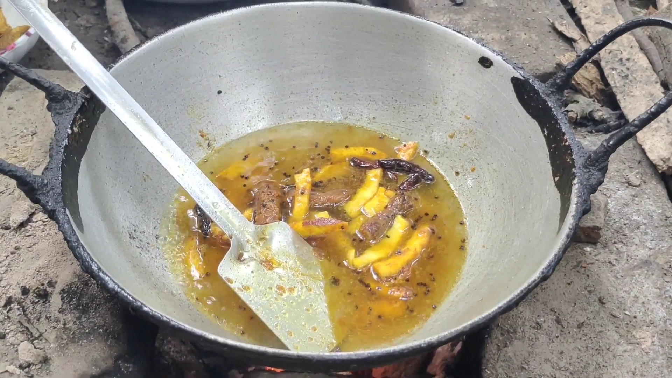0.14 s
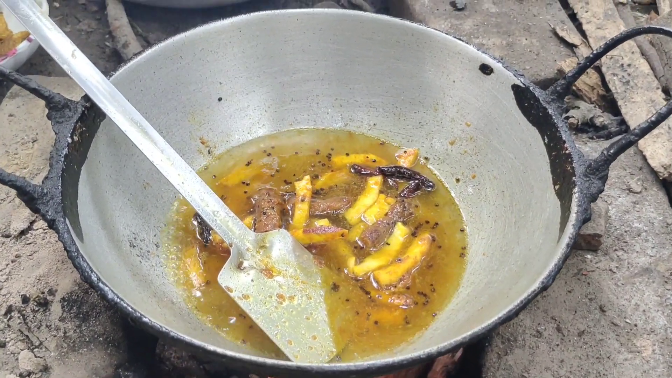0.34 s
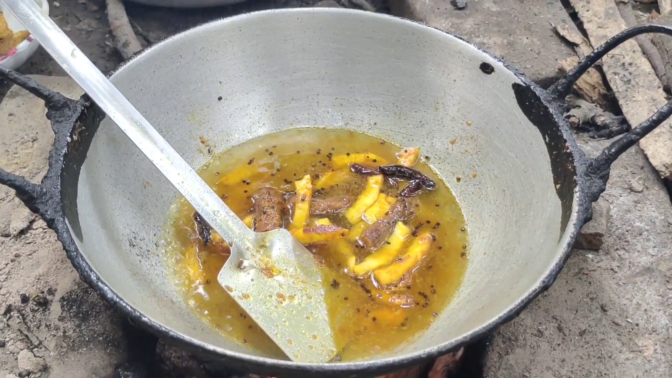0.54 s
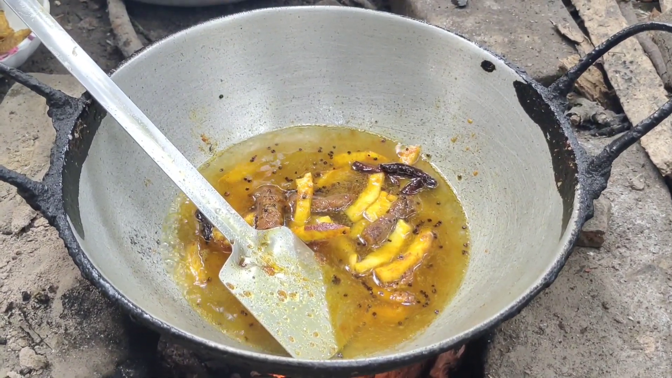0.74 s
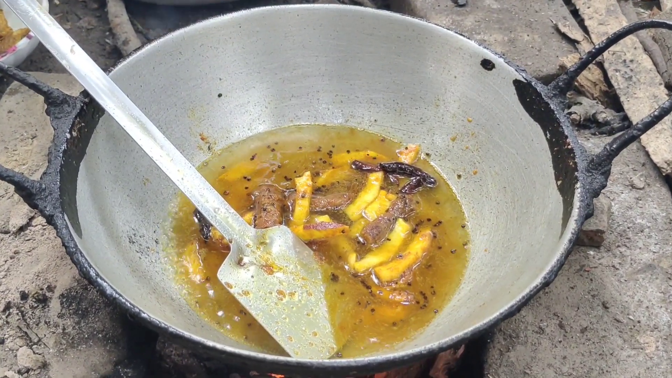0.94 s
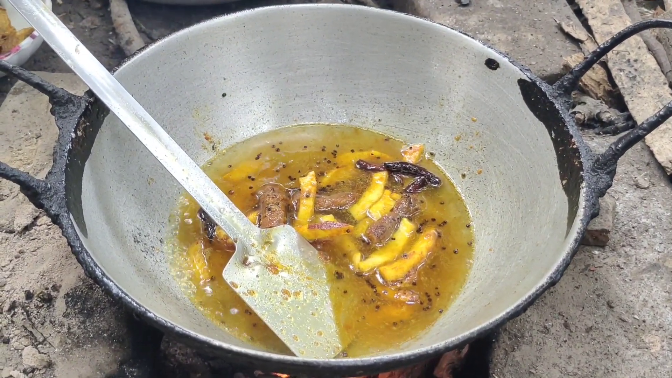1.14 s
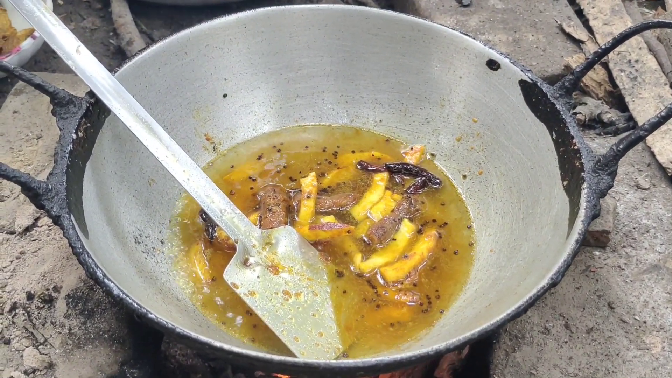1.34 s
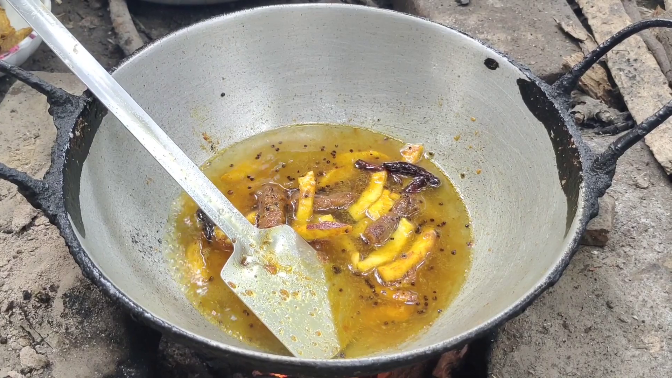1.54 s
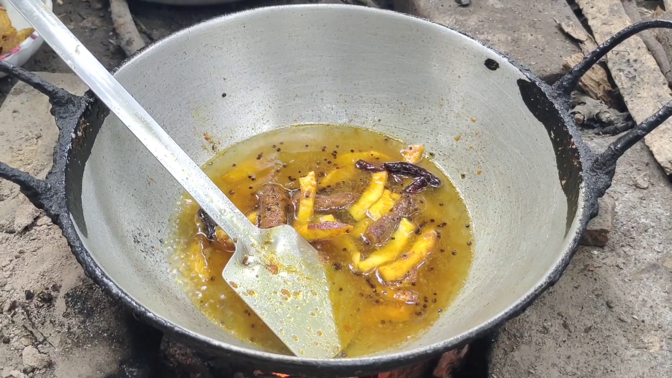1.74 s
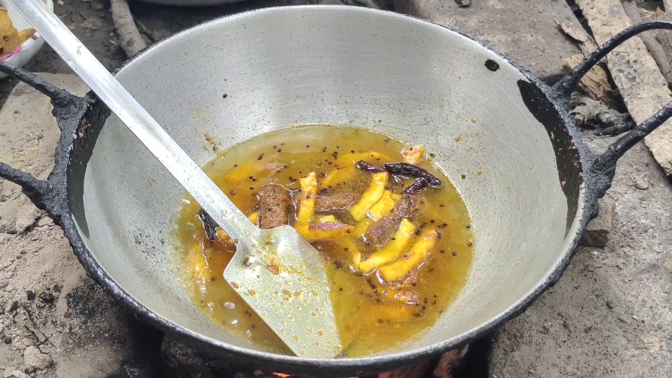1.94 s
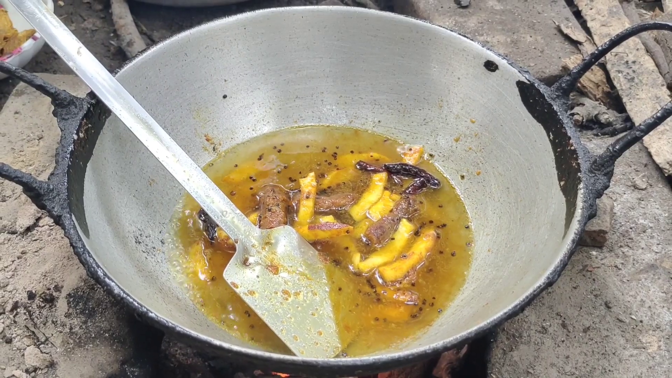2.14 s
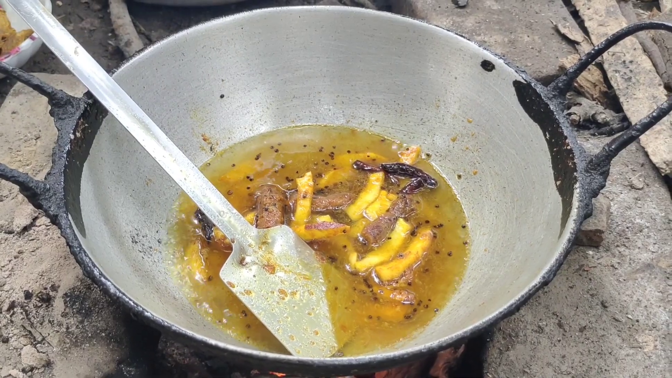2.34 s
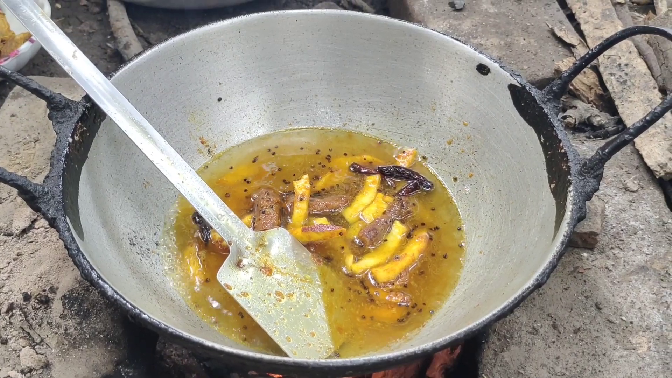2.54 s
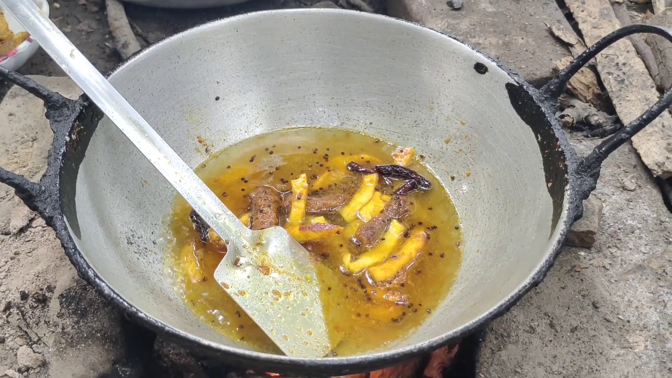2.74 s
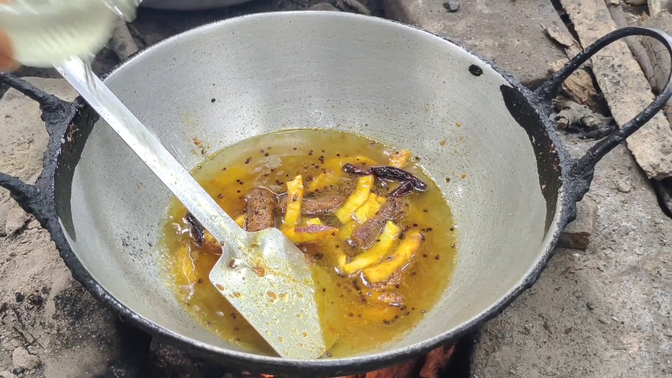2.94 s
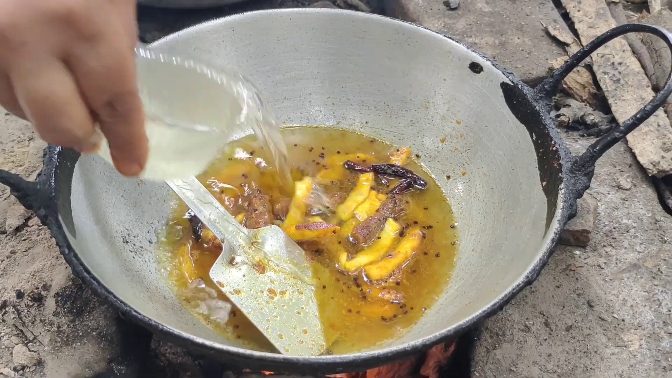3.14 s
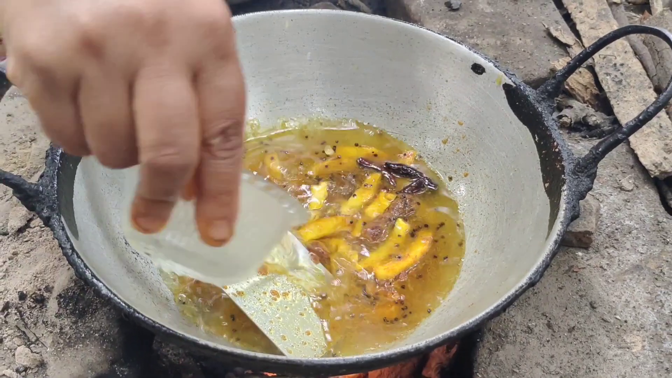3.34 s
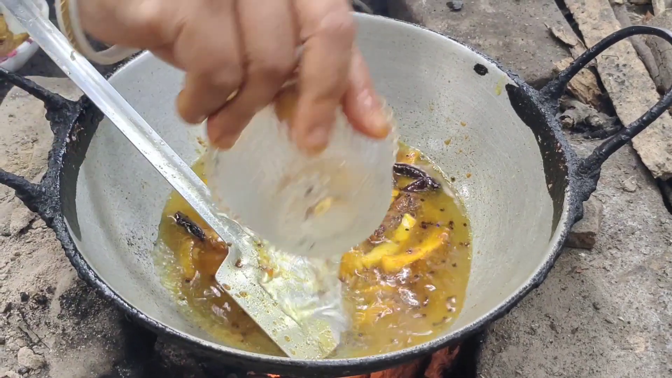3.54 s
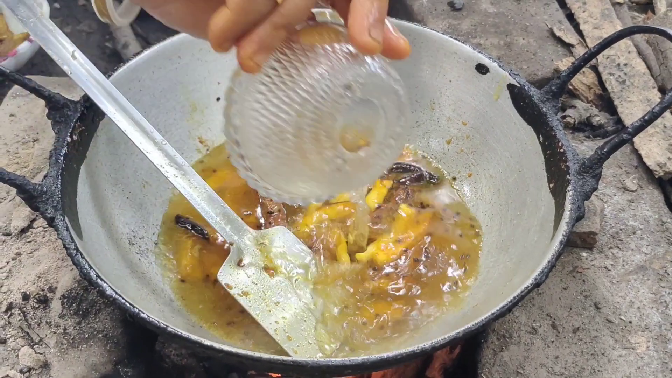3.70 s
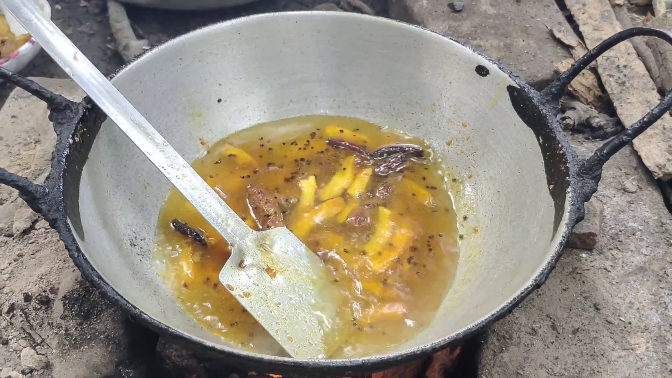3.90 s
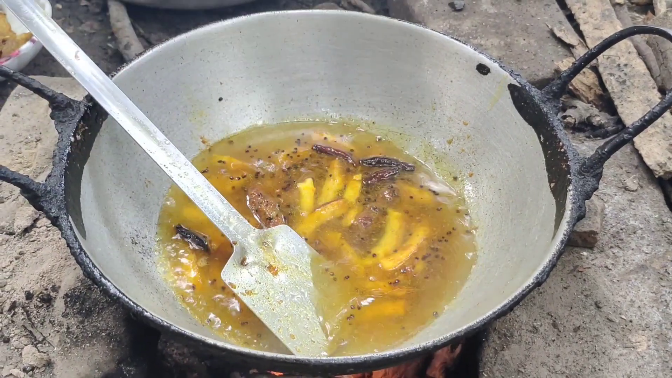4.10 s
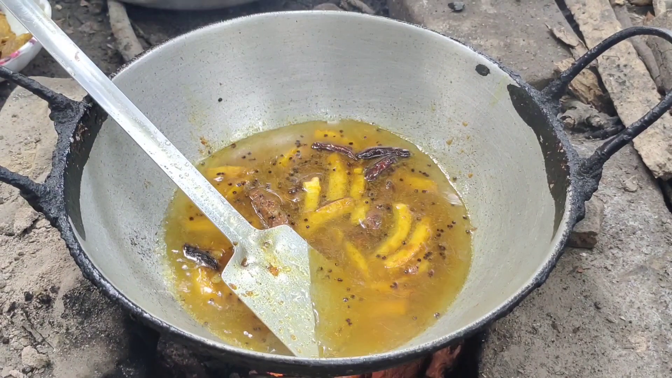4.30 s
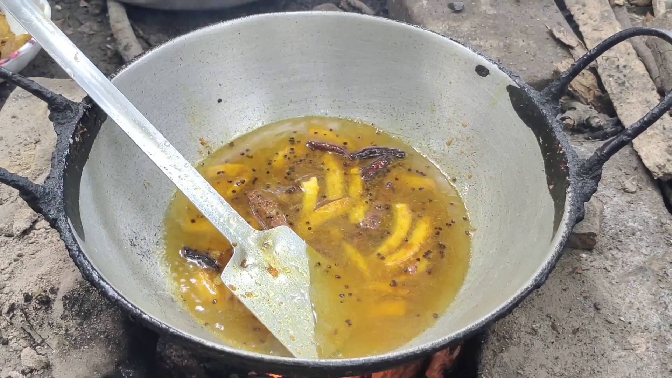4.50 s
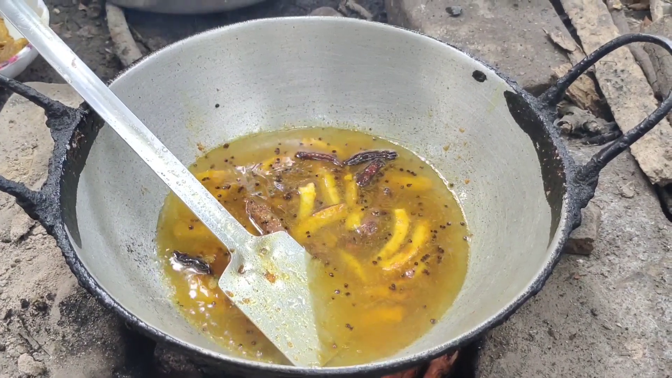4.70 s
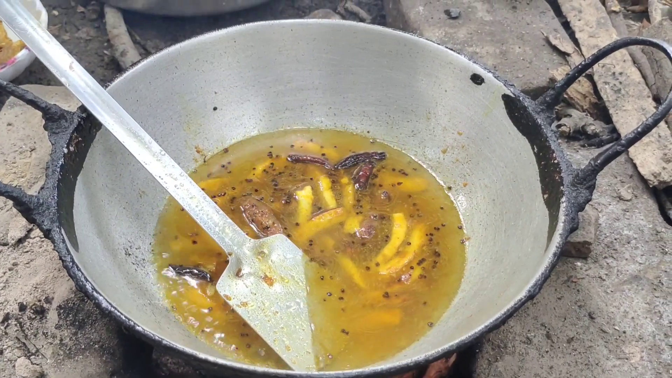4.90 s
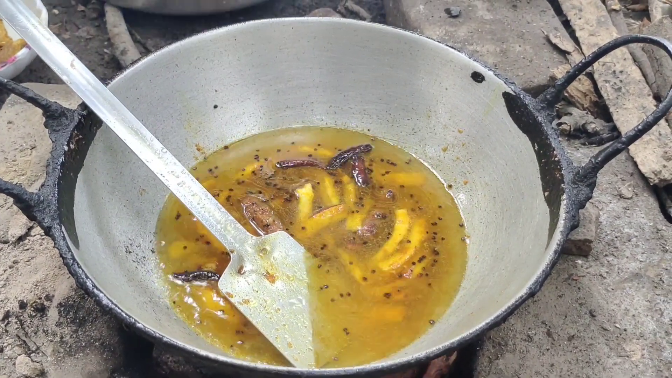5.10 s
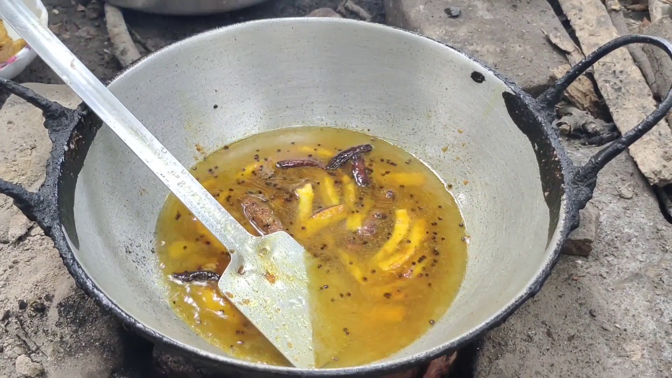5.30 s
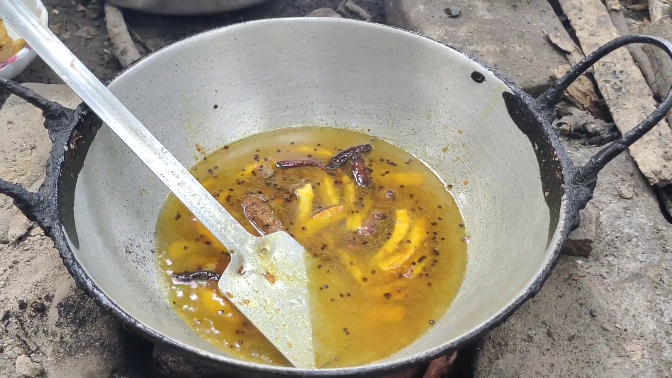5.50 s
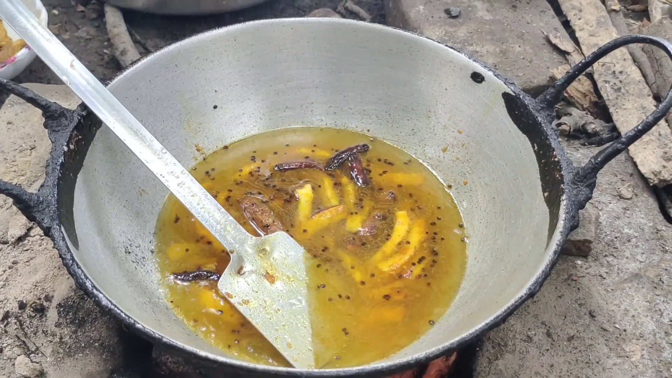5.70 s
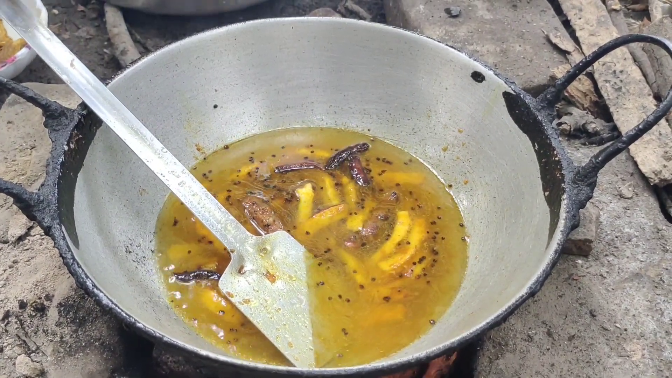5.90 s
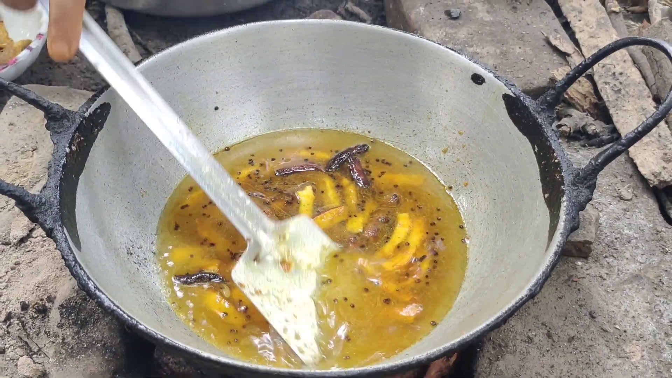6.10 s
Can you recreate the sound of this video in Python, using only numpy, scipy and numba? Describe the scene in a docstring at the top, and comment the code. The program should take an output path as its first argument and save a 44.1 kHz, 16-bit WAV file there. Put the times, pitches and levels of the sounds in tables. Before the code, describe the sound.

Hot oil crackles softly in a wok until added water flares into a dense hiss and fades, with a few light knocks nearby.

```python
"""Water hits hot oil in a metal wok and flashes into a dense sizzle of tiny bursting bubbles, which dies
away as the pan cools. For three seconds before the pour, spices fry gently; drops spit and steam
whistles through the food. Nearby, kitchen things are knocked and dragged as they are set down.
Behind it all a low hum wavers and swells over the rumble of the wood fire.
A phone with two microphones hears it from above the pan."""
import sys
import numpy as np
from scipy import signal
from scipy.fft import rfft, irfft
from scipy.io import wavfile
from scipy.ndimage import uniform_filter1d
from numba import njit

SR = 44100
rng = np.random.default_rng(int(sys.argv[2]) if len(sys.argv) > 2 else 0)


def to_wav(sig):
    """Store sig (one row per channel, or 1-D mono) as 16-bit WAV at the path in sys.argv[1].

    Samples outside -1..1 are clipped; the rate is SR.
    """
    pcm = np.clip(np.atleast_2d(sig), -1, 1) * 32767
    pcm = np.round(pcm).astype(np.int16)
    wavfile.write(sys.argv[1], SR, pcm.T)  # frames by channels


N = 271215
TIME = np.arange(N) / SR
FREQ = np.fft.rfftfreq(N, 1 / SR) + 1


# Water meets hot metal: a trickle, the bulk of the bowl, a wave up the far wall, its backwash.
# start_s, level_db, attack_s, hold_s, release_db_per_s
SPLASHES = [(3.021, -37.5, 0.22, 0.25, 26), (3.478, -30, 0.034, 0.047, 31.5),
            (3.74, -36.5, 0.052, 0.25, 22), (4.215, -46, 0.022, 0.13, 58)]
# Tone of the boil: freq_hz, gain_db
BOIL_EQ = [(350, -68), (600, -43), (798, -29), (890, -26), (1170, -34), (1340, -17), (1780, -21.5),
           (2150, -13), (2450, -5), (3100, -5), (4420, -2.5), (5560, 2.5), (6450, -1), (9000, -1.5),
           (10700, -2), (12500, -2.5), (15400, -4)]

def boiling():
    """Splashes boil off: a harder boil packs the bursts denser; big bubbles come later and lower."""
    boil = overlap(SPLASHES)
    busy = np.clip((boil / boil.max()) ** 0.78, .3, 1)
    fizz = sizzle(busy, spread_db=0.5, cycles=20.5, hiss_db=-3.5, flutter_db=0, count=110000)
    fizz = in_wok(flicker_bands(fizz, patchy_db=3.5, width_hz=23, life_s=0.025), BOIL_EQ)
    big = colour(fizz, 2 * rolloff(FREQ / 3900, 8))
    spray = colour(fizz, 2 * rolloff(10500 / FREQ, 12))
    small = unit(fizz - big) - 0.81 * busy ** 2 * spray  # the top dulls when the boil is thickest
    grown = np.interp(TIME - 0.038, TIME, boil)  # big bubbles take time to grow
    big_db = -8 - 7 * np.maximum(TIME - 3.75, 0)  # and dwindle once the pan has cooled
    return small * boil + unit(big) * amp(big_db) * grown


# Tone of the steam flash: freq_hz, gain_db
FLASH_EQ = [(3500, -26.5), (5200, -19), (5900, 9), (6600, -11), (9300, 2.5), (10300, -14), (15000, -8)]

def steam_flash():
    """The bulk of the water turns to steam at once in a short, bright hiss."""
    hiss = unit(colour(rng.standard_normal((2, N)), shape(FLASH_EQ)))
    return hiss * envelope(3.504, -27.5, attack_s=.016, hold_s=.022, release_db_per_s=240) * pan(3.5)


# Ring of the wok's thin metal: pitch_hz, width_hz, gain_db
METAL_MODES = [(795, 35, -9.5), (1362, 13, -0.5), (1436, 24, 3), (1600, 110, -14), (1940, 25, -0.5)]

def wok_metal():
    """Bubbles collapsing on the wok's floor keep it ringing, now on one mode, now on another."""
    taps = 0.19 * rng.standard_normal(N) + rng.standard_normal((2, N))
    taps = flicker_bands(taps, patchy_db=7, width_hz=160, life_s=0.098)
    ringing = colour(resonate(taps, METAL_MODES), rolloff(600 / FREQ, 6))
    drive = np.tanh(overlap(SPLASHES) / amp(-30)) ** 0.75  # the ring levels off in a hard boil
    return unit(ringing) * amp(-51.5) * drive * pan(2.1)


# Surges of the poured water: start_s, level_db, attack_s, hold_s, release_db_per_s
SLOSHES = [(3.16, -59.5, 0.077, 0.056, 67), (3.55, -57.5, 0.33, 0.22, 40), (4.46, -61, 0.054, 0.1, 97)]

def slosh():
    """The water gurgles and laps: a crowd of larger bubbles rings low."""
    when, pitch, size, length = rng.random((2400, 4)).T
    gulps = bubbles(when * N, 600 * 2 ** (1.15 * pitch), 8 + 18 * length, amp(-9 * size))
    return unit(gulps) * overlap(SLOSHES) * pan(.5)


# A wet piece vents a puff over a longer jet: start_s, level_db, attack_s, hold_s, release_db_per_s
VENTS = [(-.01, -41.5, 0.0089, 0.12, 112), (-.01, -44, 0.0082, .625, 67)]
# Tone of the oil and of the venting steam: freq_hz, gain_db
OIL_EQ = [(530, -13), (900, -7), (1300, -12.5), (1450, -5), (2330, 1), (2530, -2), (3750, 0), (4750, 2),
          (9240, -2), (10000, -2), (15400, -7.5)]
VENT_EQ = [(2000, -29), (3800, -20), (4650, -5.5), (4950, -0.5), (6200, -0.5), (7350, -0.5), (7750, -7.5),
           (9200, -10.5), (11600, -11.5), (13200, -7), (15300, -4.5)]

def frying(oil_db=-52.5, cooling_db_per_s=0.7):
    """Oil crackles softly throughout, slowly calming; at the start steam escapes from under the food."""
    oil = sizzle(0.99, spread_db=2, cycles=15, hiss_db=1, flutter_db=1.54, count=22000)
    oil = in_wok(flicker_bands(oil, patchy_db=4, width_hz=42, life_s=0.04), OIL_EQ)
    steam = sizzle(0.94, spread_db=1, cycles=4.1, hiss_db=4.5, flutter_db=2.1, count=30000)
    steam = in_wok(flicker_bands(steam, patchy_db=1, width_hz=31, life_s=0.04), VENT_EQ)
    return oil * amp(oil_db - cooling_db_per_s * TIME) + steam * overlap(VENTS)


# The last wet spots hiss dry: start_s, level_db, attack_s, hold_s, release_db_per_s
WET_SPOTS = [(4.5, -53, 0.16, 0.093, 52), (5.09, -50, 0.019, 0.11, 163), (5.27, -53.5, 0.031, 0.05, 123)]
# Tone of their hiss: freq_hz, gain_db
DRYING_EQ = [(2500, -9), (4300, -6), (4700, -7), (5400, 3), (6100, -6.5), (7100, -7), (8000, -16),
             (8600, -6), (10200, -6.5), (14000, -19)]

def drying():
    """Steam squeezes out from under a piece in a narrow, watery hiss that flares before it stops."""
    steam = sizzle(0.45, spread_db=2.5, cycles=23, hiss_db=5, flutter_db=5, count=12000)
    steam = flicker_bands(steam, patchy_db=9, width_hz=20, life_s=0.059)
    return in_wok(steam, DRYING_EQ) * overlap(WET_SPOTS)


# Steam jets: start_s, level_db, attack_s, hold_s, release_db_per_s, pitch_hz, width_hz
WHISTLES = [(0.895, -62.5, 0.042, 0.25, 110, 5180, 260), (4.42, -60, .05, 0.14, 79, 4890, 170),
            (4.51, -59, .05, 0.14, 152, 7730, 260), (4.7, -63, 0.1, 0.16, 27, 7320, 170),
            (4.786, -55, .055, 0.0086, 220, 5600, 260), (4.933, -58, 0.064, .03, 150, 5500, 160),
            (5.11, -65, 0.058, .07, 130, 5370, 140), (5.158, -49.5, 0.011, 0.017, 380, 6740, 200),
            (5.133, -61, 0.049, 0.11, 152, 4230, 260), (5.29, -61.5, 0.018, 0.016, 195, 5220, 300)]

def whistles(flutter_db=2):
    """Steam sputters through narrow gaps in the food, each jet on its own thin band."""
    jet = rng.standard_normal(N) + rng.standard_normal((2, N))
    out = sum(unit(colour(jet, bands([(hz, width_hz, 0)]))) * envelope(*contour)
              for *contour, hz, width_hz in WHISTLES)
    return out * amp(flutter_db * walk(27)) * pan(10.5)


# Single drops spitting in the oil: start_s, level_db, pitch_hz, pan_db (left minus right)
SPITS = [(0.485, -27, 7070, 0), (0.589, -30, 7360, 3), (1.0431, -33, 4200, 6), (1.457, -34, 9400, 1),
         (1.6776, -34.5, 6000, 12), (2.3516, -39, 8800, 3), (3.183, -23, 7340, 11), (3.2137, -20, 5940, 13),
         (3.289, -17.5, 4800, 4), (3.4294, -17.5, 5200, 5), (3.9162, -21, 9000, -0.5),
         (4.3164, -29, 5350, 3), (4.359, -18.5, 5400, 5.5), (4.401, -25, 6070, 10), (4.661, -31, 6200, 18),
         (4.784, -28, 7600, 9), (5.283, -33, 4080, 3)]

def spits():
    """A drop bursts: a sharp crack with a brief ping, scattered by the pan wall."""
    out, t = np.zeros((2, N)), np.arange(SR // 40) / SR
    for start_s, level_db, hz, pan_db in SPITS:
        scatter = rng.standard_normal((2, len(t))) * (np.exp(-t / 0.00074) + 0.16 * np.exp(-t / 0.011))
        ping = ring(hz, 0.0047, t) + 0.96 * ring(1.31 * hz, 0.0021, t) + 0.19 * ring(14400, 0.0013, t)
        pop = (0.54 * scatter + ping) * (1 - np.exp(-t / 0.00023))
        add(out, start_s, pop / np.abs(pop).max() * amp(level_db) * pan(pan_db))
    return colour(out, rolloff(3000 / FREQ, 4))


# Kitchen things knocked and set down: start_s, thud_db, thud_hz, clack_db, clack_hz, contact_s, rattle_s
KNOCKS = [(.001, -32, 264, -49, 1490, 0.0098, 0.021), (.040, -33.5, 295, -31.5, 1950, 0.0023, 0.11),
          (0.243, -33.5, 442, -73, 785, 0.0045, 0.025), (0.3229, -37, 460, -26.5, 2150, .0006, 0.014),
          (1.005, -40, 277, -49, 1100, 0.008, 0.21), (1.568, -42, 626, -55, 1000, .015, 0.11),
          (1.799, -37, 417, -38, 1500, 0.0025, 0.047), (1.869, -54, 440, -34.5, 1770, 0.0029, 0.033),
          (1.890, -34, 412, -36, 1670, 0.0066, 0.04), (1.96, -41, 435, -37.5, 2330, 0.005, 0.05),
          (5.035, -39.5, 253, -65, 1420, 0.02, 0.11), (5.057, -38.5, 485, -44, 1410, 0.02, 0.045),
          (5.079, -33.5, 242, -42, 1560, 0.016, 0.15), (5.097, -37.5, 202, -49, 1880, 0.0044, 0.091),
          (5.167, -36.5, 235, -36, 1790, 0.015, 0.24), (6.027, -50, 395, -49.5, 1390, .008, 0.087)]

def contacts(bounces=6, gap_s=0.017, detune_octaves=0.05):
    """Each knock, then its rattle: uneven bounces that lose 20 dB over the rattle time."""
    for start_s, thud_db, thud_hz, clack_db, clack_hz, contact_s, rattle_s in KNOCKS:
        yield start_s, thud_db, thud_hz, clack_db, clack_hz, contact_s
        delays = gap_s * np.cumsum(rng.random(bounces) + .5)
        detunes = 2 ** (detune_octaves * rng.standard_normal(bounces))
        for delay, detune in zip(delays, detunes):
            drop_db = -4 - 20 * delay / rattle_s
            dull_db = drop_db - 4  # soft bounces lose more clack than thud
            yield (start_s + delay, thud_db + drop_db, thud_hz * detune,
                   clack_db + dull_db, clack_hz * detune, contact_s)


# Ring of the knocked things: pitch_hz, gain_db, t60_s
CLACK_MODES = [(740, 24, 0.045), (1025, 16, 0.044), (1320, 3, 0.061), (1372, 7, 0.082), (1646, 3, 0.032),
               (1810, -8, 0.015), (1987, 3, 0.039), (2140, -8, 0.036), (2255, 10, 0.036), (2490, -36, .04),
               (3710, 31, 0.032)]

def knocks():
    """Each contact gives a hollow thud and rings the modes near its clack pitch; the walls answer."""
    out, t = np.zeros((2, N)), np.arange(SR // 3) / SR
    for start_s, thud_db, thud_hz, clack_db, clack_hz, contact_s in contacts():
        body = sum(amp(db - 39 * np.log2(hz / clack_hz) ** 2) * ring(hz, t60_s, t)
                   for hz, db, t60_s in CLACK_MODES)
        body += 2.6 * ring(clack_hz, 0.0077, t)  # the dry crack of the contact itself
        grit = rng.standard_normal(len(t)) + rng.standard_normal((2, len(t)))
        chatter = 30 * contact_s * np.exp(-t / 0.015)
        force = grit * (np.exp(-t / contact_s) + chatter)
        force[:, 0] += 15  # the first touch is the hardest
        hollow = ring(thud_hz, 0.031, t) + 0.3 * ring(0.82 * thud_hz, 0.025, t)
        judder = struck(grit * np.exp(-t / 0.02), hollow)
        thud = 0.73 * ring(thud_hz, 0.044, t) + 0.66 * judder
        add(out, start_s, amp(clack_db) * struck(force, body) + amp(thud_db) * thud)
    # small blunt things: no deep bass and little top
    out = signal.sosfilt(signal.butter(3, 150, "highpass", fs=SR, output="sos"), out)
    blunt = signal.sosfilt(signal.butter(6, 2650, fs=SR, output="sos"), out)
    out = 0.81 * blunt + 0.097 * colour(out, rolloff(FREQ / 5000, 6))
    walls = rng.standard_normal((2, len(t))) * np.exp(-np.log(1000) * t / 0.2) * (t > .004)
    walls /= np.sqrt(np.sum(walls ** 2) / 2)
    return (out + amp(-3.5) * signal.fftconvolve(out, walls, axes=1)[:, :N]) * pan(1.2)


# Jerks of a vessel being set down: start_s, body_db, rim_db, attack_s, hold_s, release_db_per_s
DRAGS = [(1.799, -38.5, -44, .004, .016, 260), (1.826, -38, -45, 0.019, 0.031, 222),
         (1.9, -48, -50.5, 0.0071, 0.047, 143), (5.034, -48.5, -44, 0.051, 0.014, 230),
         (5.135, -52, -44, 0.024, 0.016, 141)]
# Ring of its body and of its rim: pitch_hz, width_hz, gain_db
BODY_MODES = [(430, 105, 4), (356, 53, -11), (520, 23, -14.5), (230, 110, -8.5)]
RIM_MODES = [(1016, 240, -11.5), (1337, 137, 2), (1535, 110, -1), (1770, 120, -3), (2027, 150, 1.5),
             (2520, 110, -4.5)]

def drag():
    """A vessel scrapes in short jerks: the hollow body groans and the rim rasps."""
    body_gain = overlap([(start_s, body_db, *timing) for start_s, body_db, _, *timing in DRAGS])
    rim_gain = overlap([(start_s, rim_db, *timing) for start_s, _, rim_db, *timing in DRAGS])
    groan = stick_slip(BODY_MODES, stereo_width=0.71) * body_gain * pan(-1.2)
    rasp = stick_slip(RIM_MODES, stereo_width=1) * rim_gain * pan(3.6)
    return groan + rasp


def stick_slip(modes, stereo_width, slips_per_s=690):
    """A base sticks and slips unevenly on the ground, ringing its modes at an even level."""
    luck, size_db = rng.random((2, N)), rng.standard_normal((2, N))
    mid, side = (luck < slips_per_s / SR) * amp(size_db)
    slips = mid + stereo_width * side * np.array([[1], [-1]])
    band_limit = -10 * np.log10(1 + (FREQ / 2650) ** 24 + (150 / FREQ) ** 6)
    body = colour(slips, bands(modes) + band_limit)
    return body / np.sqrt(uniform_filter1d(np.mean(body ** 2, axis=0), size=SR // 40))


# Brushes against thin metal: start_s, level_db, pitch_hz, t60_s, contact_s
TINGS = [(0.999, -45, 1760, 0.022, 0.0063), (1.03, -45, 1715, .025, .04), (1.064, -40, 1696, 0.026, 0.037),
         (5.209, -45, 1543, 0.087, .05), (5.599, -47.5, 1644, .043, 0.19), (6.07, -49, 1370, .11, 0.044)]

def tings():
    """Thin metal is brushed: the pressure swells and eases, and it sings on one note."""
    out, t = np.zeros((2, N)), np.arange(SR // 3) / SR
    for start_s, level_db, hz, t60_s, contact_s in TINGS:
        pressure = np.sin(np.pi * np.minimum(t / contact_s, 1)) ** 2
        grit = rng.standard_normal(len(t)) + 0.5 * rng.standard_normal((2, len(t)))
        note = ring(hz, t60_s, t) * (1 - np.exp(-t / 0.0018))
        add(out, start_s, amp(level_db) * struck(grit * pressure, note))
    return out * pan(7.9)


# Glide of the hum: time_s, pitch_hz
HUM_PITCH = [(0, 131.1), (4.0, 138), (5.5, 131.9), (6.15, 131.1)]
# Faint steady tones beside it: pitch_hz, level_db
WHINE = [(98, -69.5), (329, -73), (393, -74.5), (591, -75)]

def hum():
    """A low wavering tone in a skirt of rough noise, with a few faint steady tones."""
    phase = 2 * np.pi * np.cumsum(curve(HUM_PITCH) + 1.77 * walk(14.3)) / SR
    tone = np.sqrt(2) * np.sin(phase) * (1 + 0.5 * walk(23))
    skirt_eq = shape([(50, -40), (95, 3.5), (130, 2), (175, 1.5), (240, -8.5), (450, -76), (2000, -86)])
    skirt = unit(colour(rng.standard_normal(N), skirt_eq))
    whine = sum(np.sqrt(2) * amp(db + 3.4 * walk(6.5)) * np.sin(2 * np.pi * hz * TIME + 0.12 * walk(8.4))
                for hz, db in WHINE)
    level = hum_level()
    skirt *= np.maximum(level / np.median(level), 1) ** -0.37  # it grows less, so swells sound purer
    return ((amp(-3.5) * tone + amp(-3) * skirt) * level + whine) * pan(1)


# Swells of the hum: peak_s, lift_db, half_width_s; the brief first one gives the knock at 1.0 s its low boom
HUM_SWELLS = [(1.031, 10, 0.051), (1.45, 7, 0.37), (4.1, 5.5, 1), (5.598, 13, 0.4), (5.86, 2.5, 0.16)]

def hum_level(rise_db_per_s=2, throb_hz=3.94, fade_s=5.76, fade_db_per_s=29):
    """The hum creeps up, swells and finally falls away; it throbs, less so in the swells."""
    swell_db = sum(db * np.exp(-((TIME - peak_s) / width_s) ** 2) for peak_s, db, width_s in HUM_SWELLS)
    depth_db = 3.5 * (1.5 - 1.05 * swell_db / swell_db.max())
    throb_db = depth_db * np.cos(2 * np.pi * throb_hz * (TIME - 3.06))
    fade_db = fade_db_per_s * np.maximum(TIME - fade_s, 0)
    return amp(-65 + rise_db_per_s * TIME + swell_db + throb_db - fade_db)


# Stereo width of the rumble: freq_hz, side_minus_mid_db
RUMBLE_WIDTH = [(30, -12), (80, -14), (140, -10), (300, -7.5), (600, -5.5), (1200, -0.5)]

def fire_rumble(level_db=-60.5):
    """Low bed of the fire and the surroundings, alike on both sides in the bass."""
    eq = shape([(25, -29), (59, -14), (90, -2.5), (129, -10.5), (162, -7), (232, -5.5), (327, -8.5),
                (410, -11.5), (620, -10), (1000, -17.5), (1500, -22), (2500, -48.5)])
    mid, side = colour(rng.standard_normal((2, N)), eq)
    rumble = mid + np.array([[1], [-1]]) * colour(side, shape(RUMBLE_WIDTH))
    return unit(rumble) * amp(level_db + 1.95 * walk(18)) * pan(0.85)


# Air resonances of the wok's bowl: pitch_hz, width_hz, lift_db
BOWL_MODES = [(1300, 55, 14), (1696, 190, 3.5), (1964, 95, 2), (2610, 210, 3), (3060, 24, -9),
              (3840, 33, 8.5), (4080, 70, 4.5), (5470, 35, 0.5), (5700, 60, -1.5), (6550, 43, 1),
              (6900, 26, 12), (7480, 63, 3.5), (9220, 1100, 4.5)]
# How the two microphones hear the pan: freq_hz, left_minus_right_db
MIC_BALANCE = [(600, -0.5), (1350, 5.5), (1900, 2.5), (2400, -1.5), (3500, 0), (4900, 6.5), (6400, 7),
               (7600, 10), (8400, 1), (9300, -8), (10500, -2), (12000, 1.5), (13400, 11), (15400, 11)]

def in_wok(x, eq):
    """Give a sizzle its tone, the bowl's resonances and the colour of each microphone."""
    bowl_db = sum(db / (1 + (2 * (FREQ - hz) / width_hz) ** 2) for hz, width_hz, db in BOWL_MODES)
    mics = pan(shape(MIC_BALANCE))
    mics /= np.sqrt(np.mean(mics ** 2, axis=0))
    return unit(colour(x, shape(eq) + bowl_db + rolloff(500 / FREQ, 6) + 20 * np.log10(mics)))


def sizzle(busy, spread_db, cycles, hiss_db, flutter_db, count):
    """Tiny uneven bursts all over the pan above a steam hiss; busy (0-1) is the share that sounds."""
    when, pitch, size, length, place, lean, luck = rng.random((count, 7)).T
    start = when * N
    share = (busy * np.ones(N))[start.astype(int)]
    hz = 900 + 15000 * pitch
    spread = spread_db * np.minimum(hz / 7000, 1)  # only the small bubbles snap loudly
    gain = amp(-spread * np.log(np.maximum(size, .01))) * (luck < share) / np.sqrt(share)
    lag = (place - .3) * .0006 * SR  # each spot has its own path to the two microphones
    ring_cycles = cycles * (0.013 + length ** 2)
    pops = np.array([bubbles(start + side * lag / 2, hz, ring_cycles, gain * amp(side * 1.2 * (lean - .5)))
                     for side in (1, -1)])
    hiss = amp(hiss_db) * unit(rng.standard_normal((2, N)))
    return (unit(pops) + hiss) * amp(flutter_db * walk(22))


@njit
def bubbles(start, hz, cycles, size):
    """From its start sample each bubble rings for a few cycles, with an energy set by its size."""
    out = np.zeros(N)
    for k in range(len(start)):
        life = cycles[k] * SR / hz[k]
        step = np.exp(2j * np.pi * hz[k] / SR - 3 / life)
        phasor = size[k] / np.sqrt(life) + 0j
        for i in range(max(int(start[k]), 0), min(int(start[k] + 2 * life), N)):
            phasor *= step
            out[i] += phasor.imag
    return out


def flicker_bands(x, patchy_db, width_hz, life_s):
    """Narrow bands swell and fade at random, giving the sizzle a watery, chirpy shimmer."""
    hz, seconds, bins = signal.stft(x, SR, nperseg=1024)
    band = np.exp(-((hz[:25] - hz[12]) / width_hz) ** 2)
    moment = np.exp(-((seconds[:41] - seconds[20]) / life_s) ** 2)
    patches = signal.fftconvolve(rng.standard_normal(bins.shape[1:]), np.outer(band, moment), mode="same")
    return unit(signal.istft(bins * amp(patchy_db * patches / patches.std()), SR)[1][:, :N])


def struck(force, body):
    """A body's answer to a contact force, with the energy of 8 ms at unit level."""
    answer = signal.fftconvolve(force, body[None], axes=1)[:, :len(body)]
    return answer / np.sqrt(np.sum(answer ** 2) / (.008 * SR))


def ring(hz, t60_s, t):
    """A dying tone that starts at its crest."""
    return np.cos(2 * np.pi * hz * t) * np.exp(-np.log(1000) * t / t60_s)


def resonate(x, modes):
    """Drive resonances given as pitch_hz, width_hz, gain_db."""
    response = sum(amp(db) / (1 + 1j * (FREQ / hz - hz / FREQ) * hz / width) for hz, width, db in modes)
    return irfft(rfft(x) * response, N)


def bands(modes):
    """EQ in dB of steep-sided bands given as pitch_hz, width_hz, gain_db."""
    power = sum(amp(db) ** 2 / (1 + (2 * (FREQ - hz) / width) ** 4) for hz, width, db in modes)
    return 10 * np.log10(power)


def rolloff(ratio, steepness):
    """EQ in dB: FREQ / corner cuts the highs, corner / FREQ cuts the lows."""
    return -10 * np.log10(1 + ratio ** steepness)


def shape(points):
    """EQ in dB through freq_hz, gain_db points on a log-frequency axis."""
    hz, db = np.transpose(points)
    return np.interp(np.log(FREQ), np.log(hz), db)


def colour(x, db):
    """Filter by a dB value for each frequency."""
    return irfft(rfft(x) * amp(db), N)


def envelope(start_s, level_db, attack_s, hold_s, release_db_per_s):
    """Gain that rises evenly, holds, then dies away at a steady rate."""
    age = TIME - start_s
    release_db = release_db_per_s * np.maximum(age - attack_s - hold_s, 0)
    return np.clip(age / attack_s, 0, 1) * amp(level_db - release_db)


def overlap(rows):
    """Joint gain of several envelopes, added in power."""
    return np.sqrt(sum(envelope(*row) ** 2 for row in rows))


def curve(rows):
    """A time_s, value table at every sample."""
    return np.interp(TIME, *np.transpose(rows))


def walk(rate_hz):
    """Smooth random drift of rms 1, moving at up to about rate_hz."""
    return unit(colour(rng.standard_normal(N), rolloff(FREQ / rate_hz, 4)))


def amp(db):
    """Decibels to gain."""
    return 10 ** (np.asarray(db) / 20)


def unit(x):
    """Scale so that the mean of the channels has rms 1."""
    return x / np.sqrt(np.mean(np.atleast_2d(x).mean(axis=0) ** 2))


def pan(db):
    """Channel gains for a left minus right level difference."""
    return amp(np.array([[1], [-1]]) * db / 2)


def add(out, start_s, x):
    """Mix x into out from start_s."""
    i = min(max(int(start_s * SR), 0), N)
    out[..., i:i + x.shape[-1]] += x[..., :N - i]


def scene():
    """The wok in front, kitchen handling around it, hum and fire behind."""
    wok = frying() + boiling() + steam_flash() + wok_metal() + slosh() + drying() + whistles() + spits()
    return wok + knocks() + drag() + tings() + hum() + fire_rumble()


def record(dry):
    """The phone cuts the top steeply above 15.6 kHz."""
    return signal.sosfilt(signal.ellip(10, .2, 75, 15600, fs=SR, output="sos"), dry)


dry = scene()
out = record(dry)
to_wav(out)
```